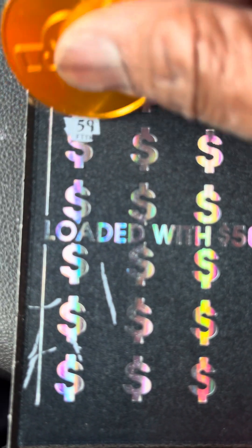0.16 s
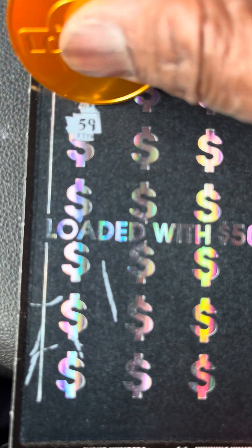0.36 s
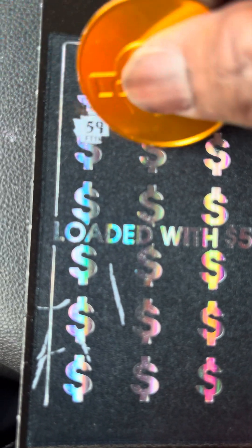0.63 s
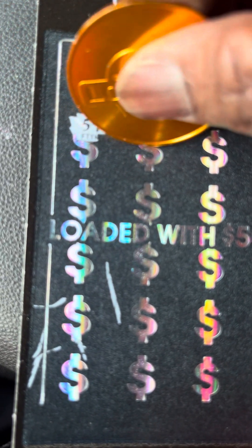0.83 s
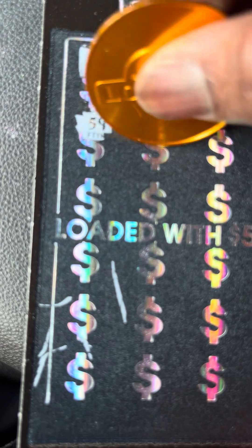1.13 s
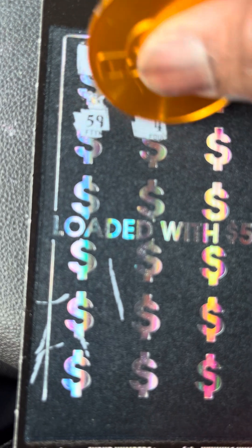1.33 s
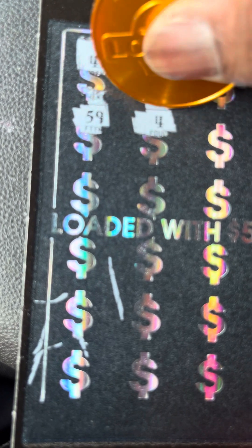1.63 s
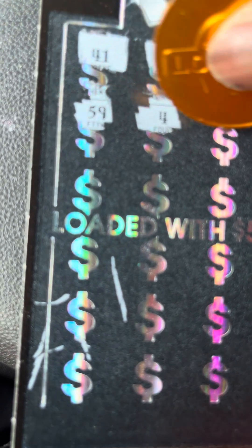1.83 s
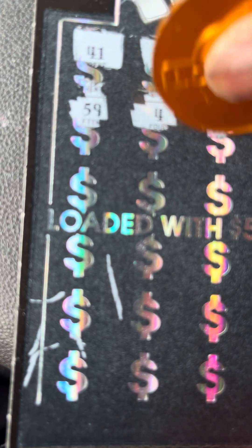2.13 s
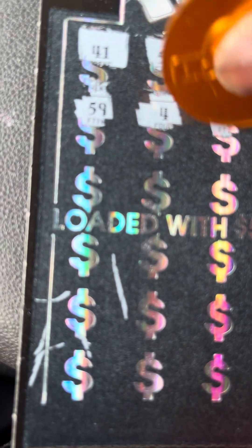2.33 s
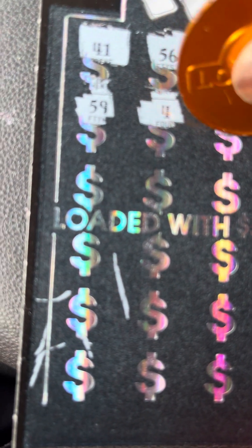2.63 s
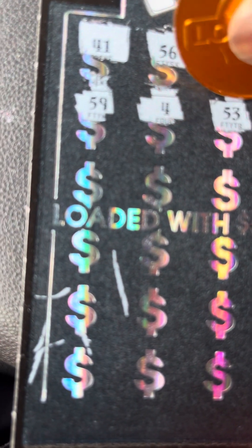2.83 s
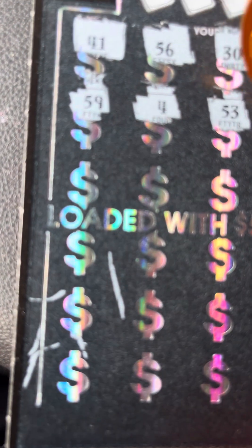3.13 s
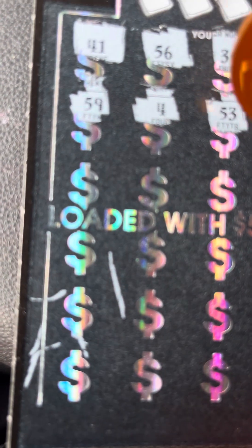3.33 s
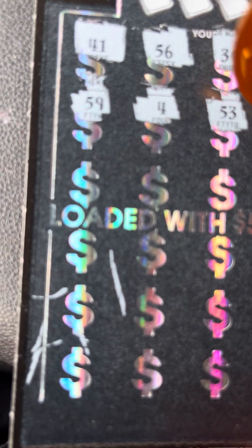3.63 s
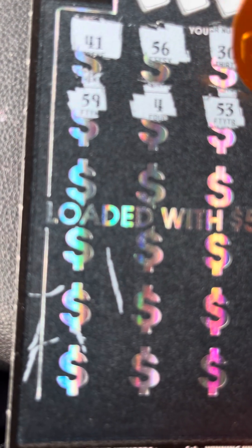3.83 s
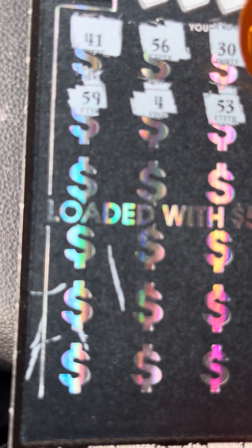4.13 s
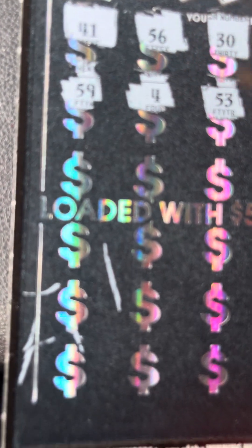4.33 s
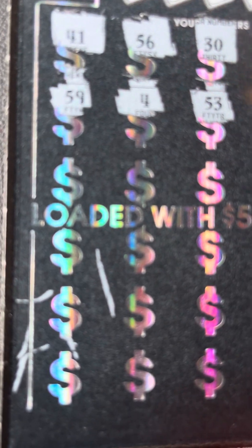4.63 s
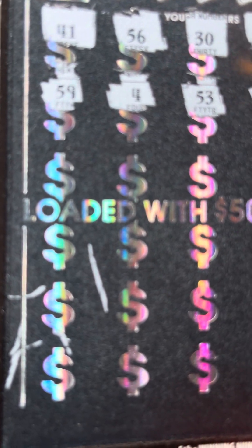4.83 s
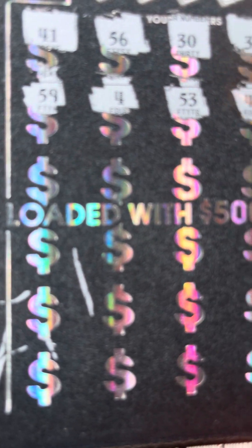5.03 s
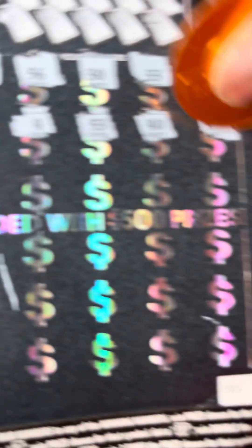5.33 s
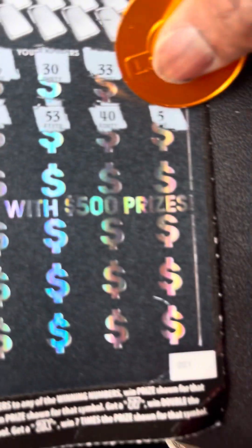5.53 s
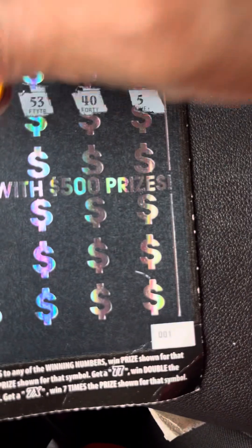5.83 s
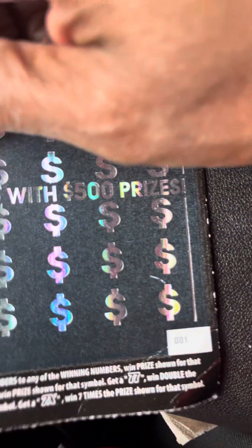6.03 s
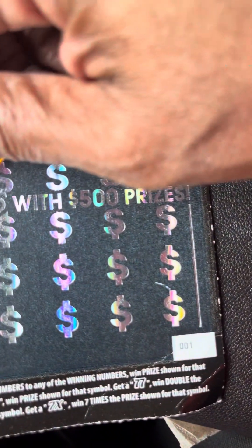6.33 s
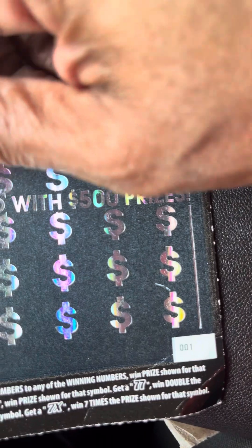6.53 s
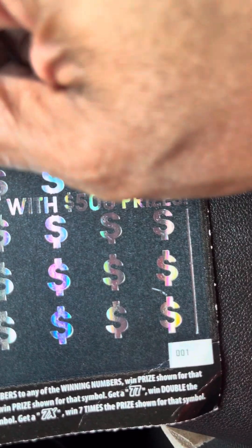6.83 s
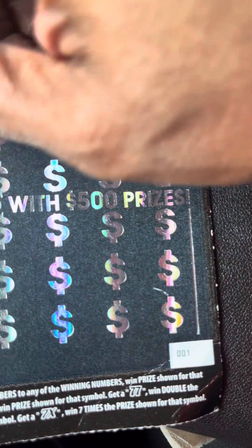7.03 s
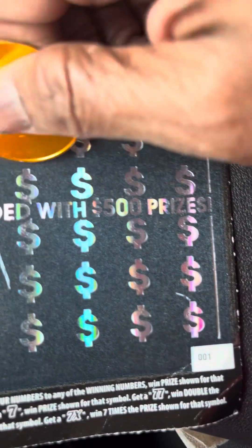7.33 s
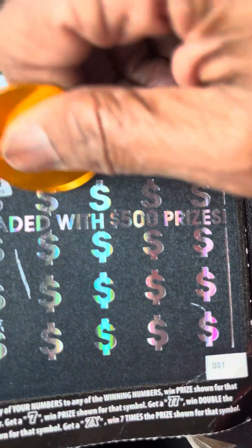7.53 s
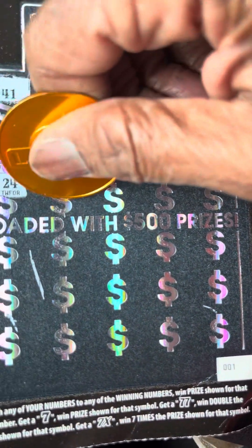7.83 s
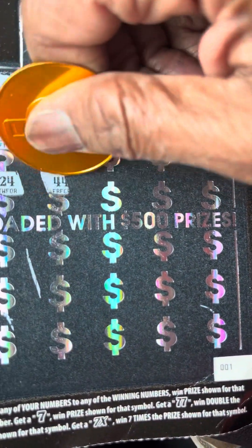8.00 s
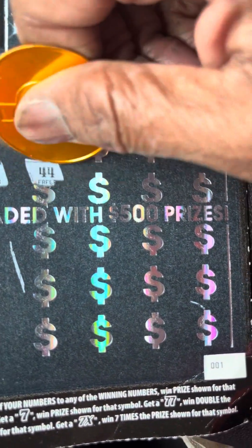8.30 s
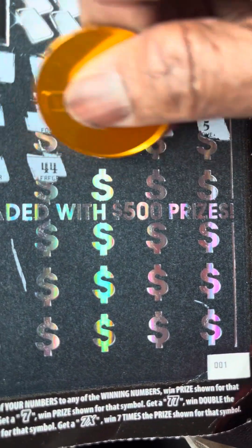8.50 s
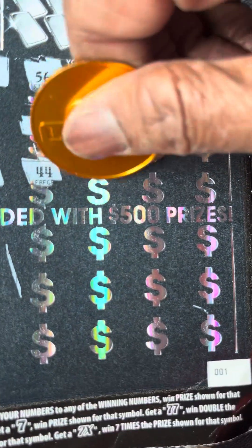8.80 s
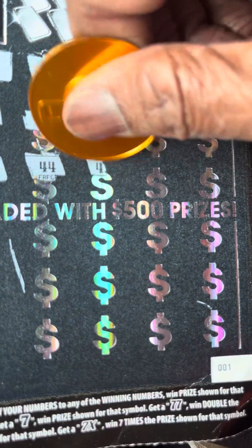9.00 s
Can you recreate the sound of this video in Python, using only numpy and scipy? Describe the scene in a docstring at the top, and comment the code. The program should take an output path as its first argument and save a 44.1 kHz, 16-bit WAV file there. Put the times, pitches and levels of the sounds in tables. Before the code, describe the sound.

Close, dry scratching on a card ticket comes in quick to-and-fro bursts, pausing for faint hand brushing and light ticks in a small dead space.

```python
"""A plastic coin scrapes the coating off a paper ticket on a leather-covered surface, in runs of quick strokes.
Flakes breaking under the rim are noise bursts driving resonances of coin, card and support, set per spot.
Ticks are short ringing noise; the sliding hand is faint grainy noise through card resonances.
Squeaks are narrow-band noise, dull knocks decaying resonant noise; short dull reflections follow them all.
Low rumble, two booming resonances and a soft wash fill the small, dead space."""
import sys
import numpy as np
from scipy import signal
from scipy.fft import rfft, irfft, next_fast_len
from scipy.io import wavfile

SR = 44100
rng = np.random.default_rng(int(sys.argv[2]) if len(sys.argv) > 2 else 0)


def persist_wave(psi):
    """Save psi, clipped to +-1, as 16-bit WAV."""
    counts = np.round(np.clip(psi, -1, 1) * 32767).astype(np.int16)
    wavfile.write(sys.argv[1], SR, np.atleast_2d(counts).T)


N = 403956
TIME = np.arange(N) / SR   # [s]


def from_db(db):
    """Level in dB to amplitude."""
    return 10 ** (np.asarray(db) / 20)


def rms_one(x):
    """Scale to rms 1."""
    return x / np.sqrt(np.mean(x ** 2) + 1e-20)


def at_hz(points, hz, axis=1):
    """Read one column of a spectrum, interpolated over log frequency."""
    table = np.array(points, float)
    return np.interp(np.log(np.maximum(hz, 1)), np.log(table[:, 0]), table[:, axis])


def gain_curve(rows):
    """Rows of (time [s], level [dB]) to a gain per sample."""
    return from_db(np.interp(TIME, *np.transpose(rows)))


def drift(rate_hz, size):
    """Random drift: rate_hz standard normal values per second, joined by straight lines."""
    position = np.arange(size) * rate_hz / SR
    return np.interp(position, np.arange(size), rng.standard_normal(size))


def resonate(x, hz, width_hz):
    """Two-pole resonance applied twice, about unit gain at its peak."""
    r = np.exp(-np.pi * width_hz / SR)
    numerator = [(1 - r * r) / 2, 0, (r * r - 1) / 2]
    denominator = [1, -(1 + r * r) * np.cos(2 * np.pi * hz / SR), r * r]
    section = numerator + denominator
    return signal.sosfilt([section, section], x + 1e-18)


def coloured(x, spectrum):
    """Impose a spectrum that falls away beyond both ends; rms 1."""
    hz = np.fft.rfftfreq(x.shape[-1], 1 / SR)
    upper_end = 1 / (1 + (hz / spectrum[-1][0]) ** 8)
    lower_end = 1 / (1 + (spectrum[0][0] / (hz + 1)) ** 4)
    gain = from_db(at_hz(spectrum, hz)) * upper_end * lower_end
    return rms_one(irfft(rfft(x) * gain, x.shape[-1]))


def wide_noise(spectrum, side_db):
    """Stereo noise: a part common to both channels plus a part in opposite phase."""
    mid, side = coloured(rng.standard_normal((2, next_fast_len(N))), spectrum)[:, :N]
    return rms_one(mid + from_db(side_db) * side * [[1], [-1]])


def add(out, start_s, sound):
    """Mix a stereo sound in at start_s."""
    at = round(start_s * SR)
    first, last = max(at, 0), min(at + sound.shape[1], N)
    out[:, first:last] += sound[:, first - at:last - at]


LEFT, RIGHT, NEXT_ROW = 0, 1, 2   # parts of the ticket
# left minus right channel level for each part of the ticket:
# (frequency [Hz], LEFT part [dB], RIGHT part [dB], NEXT_ROW part [dB])
DIRECTION = [(102, -16, -16, -4), (298, -1.5, -0.5, -2), (585, -8.5, -7, -6), (900, 0.5, -1, 5),
             (1210, -5.5, -5.5, -1), (1700, 0, -1.0, 2.5), (2100, 5, 10, 0), (2530, -2, -1, -5),
             (3250, -2, -3.5, -6.5), (3860, 1.5, 4, 11), (4400, -3.5, 3, 6), (4800, 3.5, 14, -8),
             (5530, -5.5, -13, -2), (5900, 1, 1, 1.5)]
# phase by which the left channel leads: (frequency [Hz], lead [rad])
LEAD = [(100, -.1), (550, -.7), (1400, -.4), (1850, .1), (2700, 2.8), (4200, 1.0), (5200, 1.7),
        (5700, 3.05), (6250, 3.25), (7300, 6.1), (8700, 6.45), (9750, 9.3), (10750, 9.55), (11600, 12.4),
        (13200, 12.75), (14400, 15.6)]


def from_ticket(x, part):
    """Places ticket sound in stereo with a level ratio and phase lead set by frequency."""
    size = next_fast_len(len(x) + 256)
    hz = np.fft.rfftfreq(size, 1 / SR)
    ratio = from_db(at_hz(DIRECTION, hz, axis=part + 1))
    half_lead = np.exp(.5j * np.interp(hz, *np.transpose(LEAD)))
    channels = np.array([ratio * half_lead, 1 / half_lead]) * np.sqrt(2 / (1 + ratio ** 2))
    return irfft(rfft(x, size) * channels, size)[:, :len(x)]


# rumble spectrum: (frequency [Hz], relative level [dB])
RUMBLE = [(12, -12.5), (24, -0.5), (31, -20.5), (45, -10.5), (62, -5), (102, -6), (118, -3.5), (150, -12.5),
          (190, -18.5), (245, -15), (290, -20), (400, -18), (500, -24.5), (620, -44.5)]
# low resonances of the space: (frequency [Hz], width [Hz], level [dB rms])
BOOM = [(48.4, 30.4, -45.5), (82.3, 19.5, -48.5)]
# wash level before wash_db: (time [s], level [dB])
WASH = [(0.0, -59.5), (0.59, -64.5), (1.4, -60), (3.1, -64), (4.44, -63.5), (5.1, -58), (6.3, -61.5),
        (7.2, -64), (8.07, -56.5), (8.45, -62.5), (9.16, -60.5)]
# wash spectrum: (frequency [Hz], relative level [dB])
WASH_COLOUR = [(400, 11), (550, 3), (700, 1.5), (1000, 1), (1400, -5.5), (1900, -17), (2700, -26.5),
               (6000, -40)]


def background(rumble_db=-42.5, wash_db=3.5):
    """Steady rumble noise, noise through two booming resonances, and a soft wash that swells."""
    rumble = from_db(rumble_db) * wide_noise(RUMBLE, side_db=-21.5)
    boom = 0
    for hz, width_hz, db in BOOM:
        settled = resonate(rng.standard_normal(N + SR), hz, width_hz)[SR:]   # skip the build-up
        boom = boom + from_db(db) * rms_one(settled)
    wash = from_db(wash_db) * gain_curve(WASH) * wide_noise(WASH_COLOUR, side_db=2.0)
    return rumble + boom + wash


def flakes(size, rate_per_s, spread_db, smooth_share):
    """Strength of the contact: flakes of uneven size break off over smooth friction."""
    breaks = rng.random(size) < rate_per_s / SR
    sizes = from_db(spread_db * np.minimum(rng.exponential(1, size), 4))
    share = np.clip(smooth_share, 0, 1)
    return np.sqrt(share + (1 - share) * rms_one(breaks * sizes) ** 2)


def crumbs(rate_per_s=14, catch_db=13.5, decay_s=0.00074):
    """Loose crumbs of coating catch under the hand, each a brief decaying jump in friction."""
    catches = (rng.random(N) < rate_per_s / SR) * rng.random(N)
    jumps = signal.lfilter([1], [1, -np.exp(-1 / (decay_s * SR))], catches + 1e-18)
    return 1 + from_db(catch_db) * jumps


# hand slides on the card, between or within runs; levels relative:
# (time of fastest motion [s], speeding up [s], slowing down [s], level [dB])
HAND_SLIDES = [(0.5, 0.2, 0.24, -73.5), (0.67, 0.029, 0.024, -61), (1.45, 0.055, 0.049, -68),
               (1.8, 0.17, 0.13, -61.5), (3.01, 0.067, 0.088, -61.5), (4.33, 0.13, 0.12, -61.5),
               (5.53, 0.025, 0.15, -60.5), (5.92, 0.021, 0.054, -65.5), (6.04, 0.02, 0.068, -61.5),
               (7.2, 0.087, 0.17, -62.5), (7.38, 0.049, 0.2, -72), (8.45, 0.048, 0.025, -59.5),
               (8.61, 0.1, 0.14, -63.5)]


def brushing(resting_db=-78, slide_edge_db=-11, drag_db=-71.5, drag_lag_s=0.022, drag_width_s=0.051):
    """Light contact: hand at rest, a swell per hand slide, and a short coin drag after each stroke."""
    t = TIME[::100]
    power = from_db(2 * resting_db)
    for fastest_s, speeding_s, slowing_s, db in HAND_SLIDES:
        away = (t - fastest_s) / np.where(t < fastest_s, speeding_s, slowing_s)
        power = power + from_db(db + slide_edge_db * away ** 2) ** 2
    for _, end_s, *_ in STROKES:
        away = (t - end_s - drag_lag_s) / drag_width_s
        power = power + from_db(2 * drag_db) * np.exp(-away ** 2)
    return np.interp(TIME, t, np.sqrt(power))


# resonances of the lightly brushed card: (frequency [Hz], width [Hz], relative level [dB])
SLIDE_MODES = [(2190, 170, 1.5), (3260, 1540, 0.5), (4680, 1600, -8.5), (5780, 1900, -0.5),
               (8300, 2100, -7), (10040, 1700, -4.5), (12540, 5200, -10.5)]


def sliding(slide_db=-4.5, drift_db=-2.5, drift_rate_hz=8):
    """Skin and coin brush the card: grainy noise through card resonances whose levels drift."""
    grain = flakes(N, rate_per_s=3000, spread_db=2.2, smooth_share=.8) * crumbs()
    brush = 0
    for hz, width_hz, db in SLIDE_MODES:
        level = from_db(db + drift_db * drift(drift_rate_hz, N))
        brush = brush + level * resonate(grain * rng.standard_normal(N), hz, width_hz)
    return from_ticket(from_db(slide_db) * brushing() * rms_one(brush), LEFT)


def hollow(x, echo_db=-8.0, t60_s=0.024):
    """The hollow of hand and card throws the stroke back at once, carving narrow peaks and dips."""
    t = np.arange(SR // 40) / SR
    echoes = rng.standard_normal(len(t)) * from_db(-60 * t / t60_s)
    highpass = signal.butter(2, 900, "high", fs=SR, output="sos")
    echoes = signal.sosfilt(highpass, echoes / np.linalg.norm(echoes))
    mixed = x + from_db(echo_db) * signal.fftconvolve(x, echoes)[:len(x)]
    return mixed / np.sqrt(1 + from_db(2 * echo_db))


# resonances of the support under the ticket: (frequency [Hz], width [Hz], relative level [dB])
SUPPORT = [(245, 71.5, 4), (336, 144, -2)]


def stroke(row, direction, modes, top_db, tuning, edge_db=-15, lifted_db=-31, touch_db=-28,
           judder_db=1.5, judder_rate_hz=330, lurch_db=0.65, lurch_rate_hz=70):
    """The rim bites, judders along and lifts, driving each mode with noise; returns (start [s], sound)."""
    start_s, end_s, rise_s, level_db, swell_db, thump_db = row
    fall_s, knock_db, lean_top_db, lean_tuning = direction
    t = start_s + np.arange(-SR // 200, SR // 6) / SR
    corners_s = [start_s, end_s - fall_s, end_s, end_s + fall_s, end_s + 3 * fall_s]
    corners_s = np.maximum.accumulate(corners_s)
    force_db = np.interp(t, corners_s, [-swell_db / 2, swell_db / 2, edge_db, lifted_db, -70])
    bite = np.clip((t - start_s) / rise_s, from_db(touch_db), 1)
    force = from_db(level_db + force_db) * bite
    judder = judder_db * drift(judder_rate_hz, len(t))
    lurch = lurch_db * drift(lurch_rate_hz, len(t))
    grain = flakes(len(t), rate_per_s=3000, spread_db=3.5, smooth_share=0.23)
    contact = force * from_db(judder + lurch) * grain
    # coin angle shares the force between support (thump), card (knock) and rim (top)
    angle = [(380, thump_db), (800, knock_db), (1400, knock_db),
             (2400, 0.019), (6500, 0.022), (12000, top_db + lean_top_db)]
    sound = 0
    for hz, width_hz, mode_db in list(SUPPORT) + list(modes):
        push = hollow(contact * rng.standard_normal(len(t)))   # flakes excite each mode differently
        tuned_hz = hz * tuning * lean_tuning if hz > 2000 else hz
        power = np.mean(force ** 2) * np.pi * width_hz / (2 * SR)   # proportional to mode width
        gain = from_db(mode_db + at_hz(angle, hz)) * np.sqrt(power)
        sound = sound + gain * rms_one(resonate(push, tuned_hz, width_hz))
    return t[0], sound


# strokes, pushed and pulled in turn; levels relative:
# (start [s], end [s], time to bite [s], level [dB], swell over the stroke [dB], support thump [dB])
STROKES = [(.007, .07, 0.024, -26.5, -2, -1), (0.159, 0.232, 0.0094, -20.5, 3.5, -3),
           (0.777, 0.86, 0.0042, -30, 8, 10), (.926, 0.995, 0.0047, -24, -11, -0.5),
           (1.041, 1.128, 0.015, -30.5, 18, 5), (1.17, 1.247, .007, -18.5, -9, -1.5),
           (1.333, 1.408, .011, -25.5, -7, 0.5), (1.482, 1.542, 0.011, -23, 6, -1.5),
           (2.013, 2.085, .002, -24, -0.5, 7), (2.134, 2.198, 0.013, -22.5, -1, 5),
           (2.272, 2.356, .012, -29, 11.5, 9), (2.412, 2.478, 0.018, -23, 0, 0),
           (2.536, 2.623, .016, -29.5, 12.5, 8), (2.671, 2.756, 0.025, -24.5, 1, 5),
           (3.288, 3.377, 0.0026, -29, 3.5, 11), (3.454, 3.509, 0.013, -21.5, -0.5, 3),
           (3.589, 3.672, 0.031, -27, -1.5, 9), (3.727, 3.789, .017, -25, 0.5, 7.5),
           (3.867, 3.955, 0.026, -29, 5.5, 6), (3.997, 4.063, 0.018, -26.5, 11, 3),
           (4.55, 4.641, 0.006, -25, -1, 12.5), (4.73, 4.792, 0.01, -21.5, -3, 5),
           (4.863, 4.948, 0.018, -24.5, 4, 4.5), (5.02, 5.091, 0.022, -23, -4, -1.5),
           (5.186, 5.265, 0.027, -21.5, 0, 2), (5.321, 5.392, .024, -27, 7, -1),
           (6.187, 6.28, 0.0083, -24.5, 3.5, 3), (6.354, 6.401, 0.0082, -20, -4, -5.5),
           (6.5, 6.559, 0.0018, -21, 10.5, -3), (6.617, 6.711, 0.011, -25.5, 3, 0.5),
           (6.763, 6.846, 0.0074, -25.5, 10.5, 0), (6.89, 6.983, 0.009, -24.5, 5.5, 0.5),
           (7.442, 7.55, 0.033, -24, -5, 5.5), (7.629, 7.69, 0.024, -18.5, -14.5, -1),
           (7.747, 7.818, 0.017, -24.5, 3.5, -0.5), (7.877, 7.974, 0.03, -25.5, -2, 2),
           (8.021, 8.101, 0.032, -24.5, -8.5, 1.5), (8.189, 8.262, 0.033, -22.5, -15.5, -1),
           (8.728, 8.822, 0.025, -25, -8.5, 9.5), (8.909, 8.951, .007, -22.5, 2.5, 1.5),
           (9.022, 9.109, 0.0057, -23, 5.5, 3.5)]
# stroke directions: (time to lift [s], card knock [dB], top [dB], tuning ratio above 2 kHz [1])
PUSH = (0.014, 0.3, -1.1, 1)
PULL = (0.012, -1.15, 0.8, 1.006)
# card and coin resonances per spot, before tuning: (frequency [Hz], width [Hz], relative level [dB])
SPOT_A = [(615, 115, -3.5), (1018, 450, -4), (2520, 450, -16), (4050, 1480, -11.5), (4890, 440, -10),
          (6280, 810, -13), (9650, 1700, -16.5), (12700, 2500, -18.5)]
SPOT_B = [(606, 260, -8), (1038, 315, -1), (2450, 350, -13), (4140, 2400, -8.5), (5000, 320, -11.5),
          (6450, 730, -11.5), (9960, 2000, -18), (12900, 3000, -22.5)]
SPOT_C = [(630, 340, -61), (1023, 305, 1.5), (2500, 810, -13), (3910, 1550, -4.5), (5070, 970, -1.5),
          (6290, 650, -3), (10100, 1940, -14), (12460, 1000, -17)]
SPOT_D = [(1010, 264, 0), (2440, 930, -15.5), (3670, 980, -0.5), (4700, 1360, -10.5), (6020, 790, -4.5),
          (9530, 1600, -14.5), (11840, 2600, -20.5)]
SPOT_E = [(614, 300, -12), (1086, 440, -6), (2810, 770, -13.5), (3910, 370, -17.5), (5480, 1700, -16.5),
          (6470, 560, -49), (8160, 910, -22), (10330, 2000, -22.5), (13300, 4000, -28)]
SPOT_F = [(597, 310, -12), (1065, 400, -3.5), (2780, 650, -14), (4040, 810, -18.5), (5300, 1240, -13),
          (6700, 600, -23), (7820, 1400, -20.5), (10300, 980, -22), (11200, 770, -24), (13600, 4700, -27)]
SPOT_G = [(1045, 280, -1.5), (2750, 520, -13.5), (4140, 840, -14), (5620, 980, -9), (6620, 880, -13),
          (9800, 500, -21), (10850, 1000, -18), (12600, 5600, -24)]
# runs of strokes: (from [s], resonances, part of the ticket, top [dB],
# tuning ratio at first [1], its fall as the coin moves on [1/s])
RUNS = [(0, SPOT_A, LEFT, -7, 1.024, 0.01), (0.75, SPOT_A, LEFT, -3, 1.015, 0.002),
        (2.0, SPOT_B, LEFT, 1, 1.01, 0.0024), (3.25, SPOT_C, LEFT, -1.5, 1.029, 0.023),
        (4.5, SPOT_D, RIGHT, -3, 1.053, 0.067), (6.15, SPOT_E, NEXT_ROW, -4.5, 1.023, 0.023),
        (7.4, SPOT_F, NEXT_ROW, -2, 1.002, 0.0093), (8.7, SPOT_G, NEXT_ROW, -1.5, 0.991, 0.013)]


def scratching():
    """The coin goes to and fro; the spot's resonances above 2 kHz sink in pitch along each run."""
    out = np.zeros((2, N))
    for k, row in enumerate(STROKES):
        run = [run for run in RUNS if run[0] <= row[1]][-1]
        since_s, modes, part, top_db, tuning, fall_per_s = run
        tuning_now = tuning - fall_per_s * (row[0] - since_s)
        start_s, sound = stroke(row, PULL if k % 2 else PUSH, modes, top_db, tuning_now)
        add(out, start_s, from_ticket(sound, part))
    return out


def reflections(x, wet_db=-11.5, t60_s=0.063, first_s=0.0041, dull_hz=5000):
    """Close, soft surfaces answer with a short dull noise tail, different in each channel."""
    t = np.arange(SR // 6) / SR
    tail = rng.standard_normal((2, len(t))) * from_db(-60 * t / t60_s) * (t > first_s)
    tail /= np.sqrt(np.sum(tail ** 2, axis=1, keepdims=True))
    lowpass = signal.butter(2, min(dull_hz, SR / 3), fs=SR, output="sos")
    tail = signal.sosfilt(lowpass, tail)
    return from_db(wet_db) * signal.fftconvolve(x, tail, axes=1)[:, :N]


# coin touches down or card flicks; onset leads by early_s: (time [s], relative level [dB], ring [Hz])
TICKS = [(0.3833, -51.5, 3960), (0.6514, -56, 1860), (0.932, -34, 4360), (1.1574, -43, 7030),
         (1.174, -42, 4810), (1.246, -38, 4890), (1.554, -41, 4790), (1.711, -43.5, 5300),
         (1.735, -43, 5670), (1.879, -39.5, 11200), (2.955, -47, 2190), (3.1873, -36.5, 8500),
         (3.29, -46, 4970), (3.4443, -46, 5090), (3.5765, -43, 4970), (3.8563, -40, 5000),
         (4.4214, -35.5, 9700), (4.717, -41, 3870), (4.997, -45, 3860), (5.5228, -43, 3670),
         (5.9123, -49, 3700), (6.0325, -34, 4700), (6.993, -45, 6990), (7.087, -51, 2100),
         (7.2441, -31, 4400), (8.582, -37, 8300), (8.6413, -48, 2090), (8.971, -36.5, 5300)]
# crack spectrum: (frequency [Hz], relative level [dB])
TICK_COLOUR = [(500, -2), (1100, -29), (2000, -1), (3200, 4.5), (5200, 6.5), (7000, 6.5), (10000, -5),
               (13000, -4), (16000, -29)]


def ticks(crack_db=-6.5, ring_db=-3.0, ring_width_hz=2000, decay_s=0.0012,
          knock_db=-18.5, knock_hz=1100, knock_width_hz=450, early_s=0.000786):
    """Light touch: decaying crack and ring at its own pitch, over a card knock (resonance impulse response)."""
    out, t = np.zeros((2, N)), np.arange(SR // 20) / SR
    knock = resonate(t == 0, knock_hz, knock_width_hz)
    knock = from_db(knock_db) * knock / np.abs(knock).max()
    for time_s, level_db, hz in TICKS:
        crack = from_db(crack_db) * coloured(rng.standard_normal(len(t)), TICK_COLOUR)
        ring = from_db(ring_db) * rms_one(resonate(rng.standard_normal(len(t)), hz, ring_width_hz))
        sound = (crack + ring) * np.exp(-t / decay_s) + knock
        add(out, time_s - early_s, from_db(level_db) * from_ticket(sound, LEFT))
    return out


# faint squeaks of the sliding hand: (start [s], length [s], frequency [Hz], relative level [dB])
SQUEAKS = [(1.832, 0.24, 4570, -79), (2.996, 0.13, 3280, -71), (4.275, 0.13, 3260, -65),
           (4.4, 0.24, 3800, -74)]


def squeaks(width_hz=260):
    """A slow, light slide sings faintly: noise in one narrow resonance, swelling and fading."""
    out = np.zeros((2, N))
    for start_s, length_s, hz, db in SQUEAKS:
        size = int(length_s * SR)
        tone = rms_one(resonate(rng.standard_normal(size), hz, width_hz)) * np.hanning(size)
        add(out, start_s, from_ticket(from_db(db) * tone, LEFT))
    return out


# dull knocks: (start [s], frequency [Hz], width [Hz], relative level [dB])
DULL_KNOCKS = [(5.521, 1860, 910, -41.5), (5.884, 750, 400, -47), (6.191, 1190, 595, -35)]


def dull_knocks(decay_s=0.0024):
    """Dull knocks, as the ticket shifts or the coin lands hard: papery, decaying resonant noise."""
    out, t = np.zeros((2, N)), np.arange(SR // 10) / SR
    for start_s, hz, width_hz, db in DULL_KNOCKS:
        knock = rms_one(resonate(rng.standard_normal(len(t)), hz, width_hz)) * np.exp(-t / decay_s)
        add(out, start_s, from_ticket(from_db(db) * knock, RIGHT))
    return out


def scene():
    """Ticket sounds, their reflections and the background."""
    ticket = sliding() + scratching() + ticks() + squeaks() + dull_knocks()
    return background() + ticket + reflections(ticket)


def record(dry, cutoff_hz=15900):
    """A steep elliptic low-pass cuts the top."""
    lowpass = signal.ellip(10, .1, 80, cutoff_hz, fs=SR, output="sos")   # ripple, stopband [dB]
    return signal.sosfilt(lowpass, dry)


dry = scene()
out = record(dry)
persist_wave(out)
```